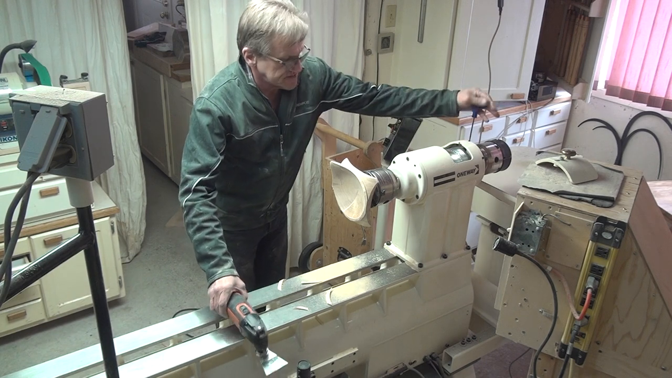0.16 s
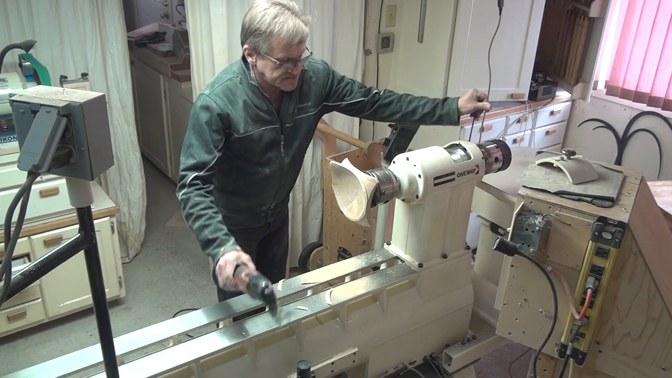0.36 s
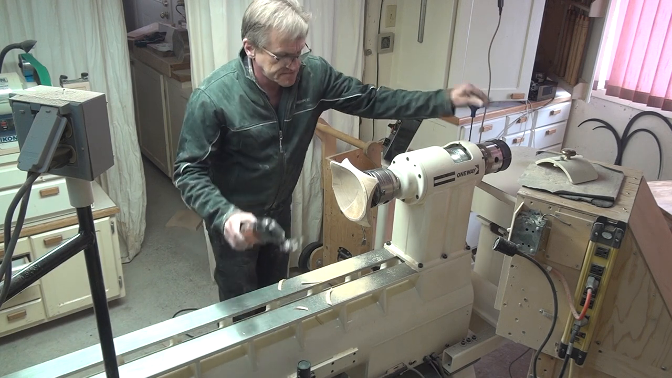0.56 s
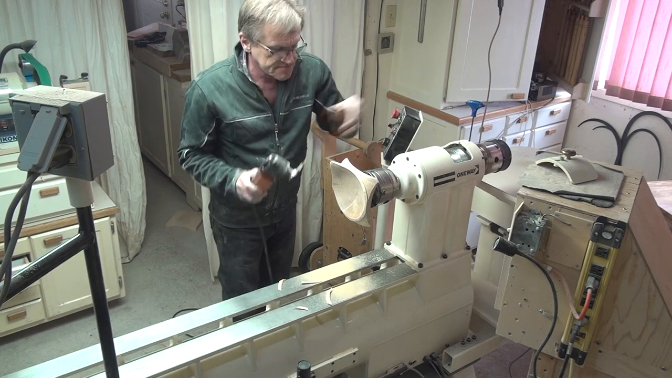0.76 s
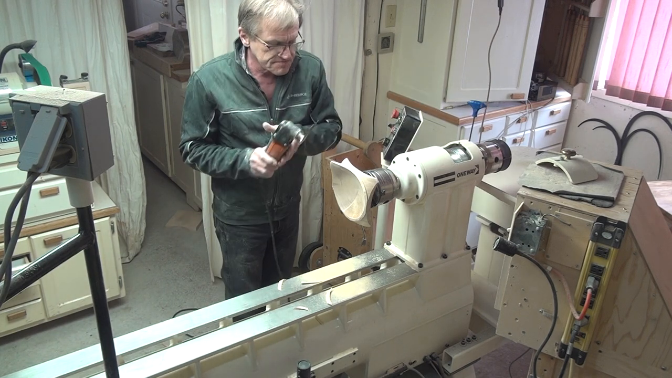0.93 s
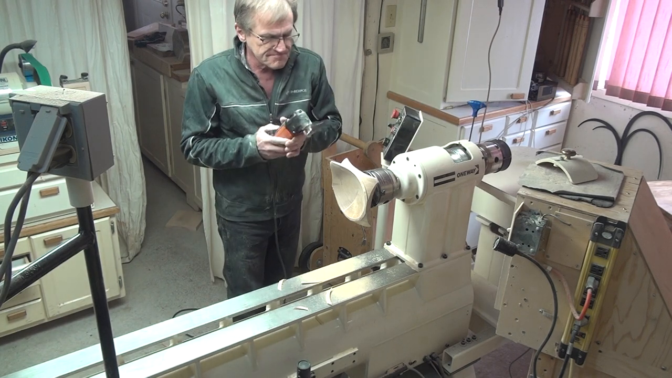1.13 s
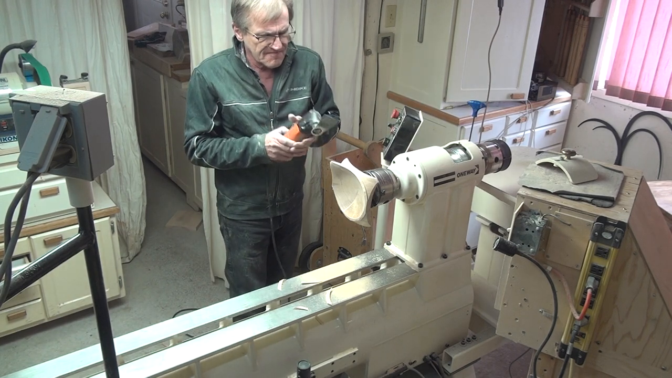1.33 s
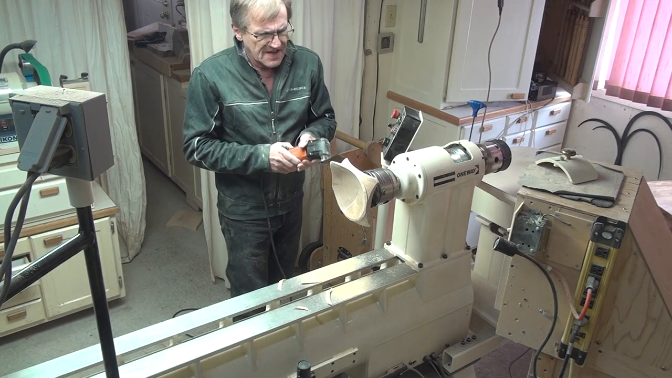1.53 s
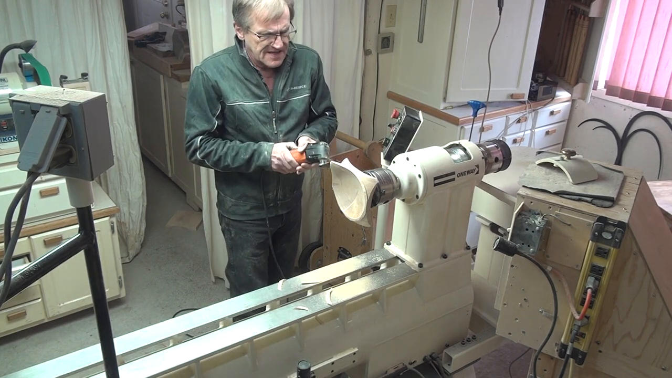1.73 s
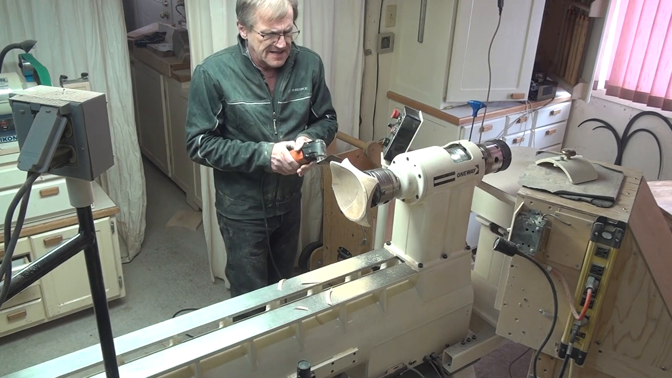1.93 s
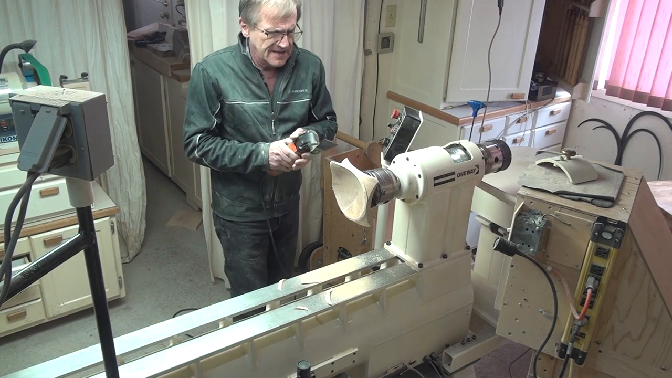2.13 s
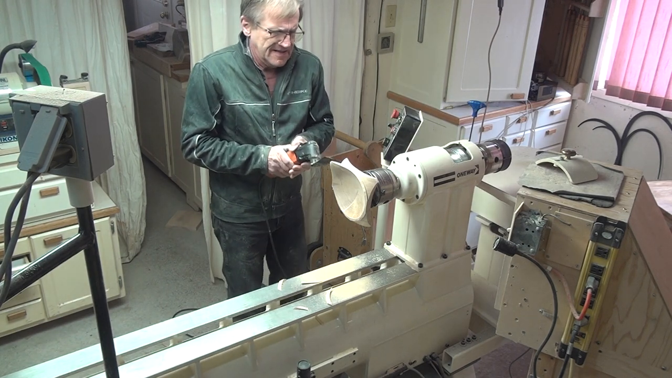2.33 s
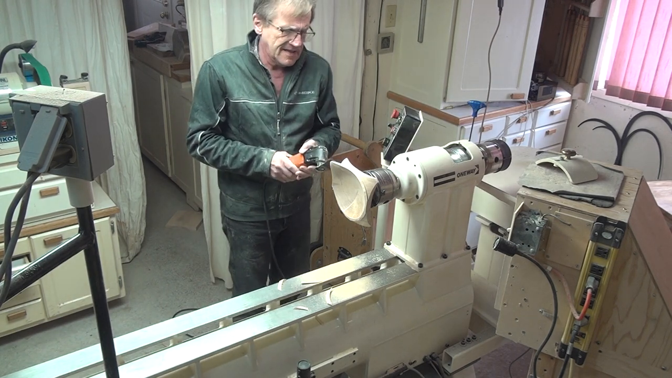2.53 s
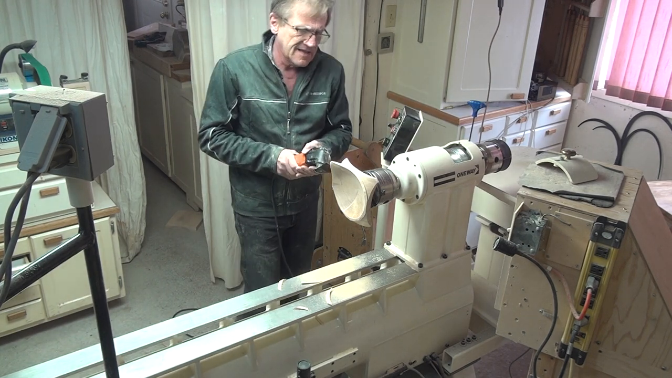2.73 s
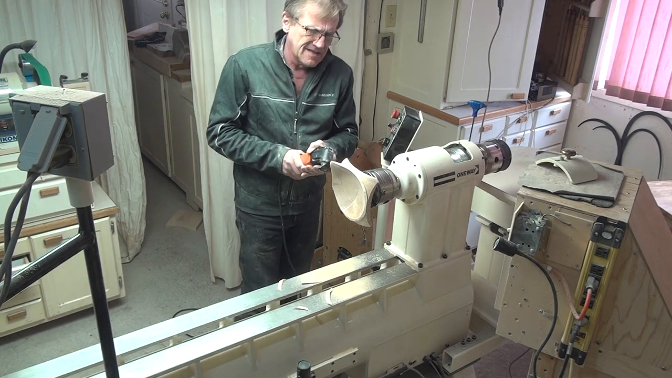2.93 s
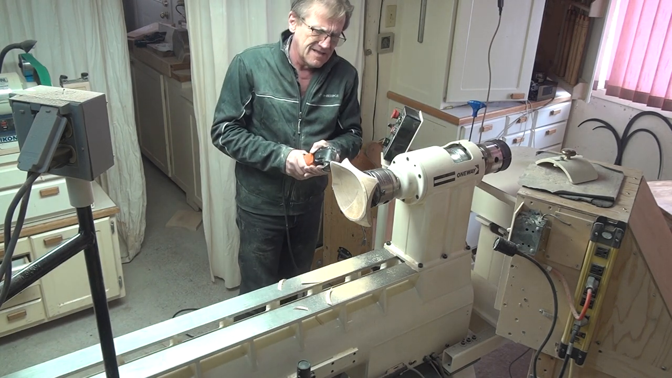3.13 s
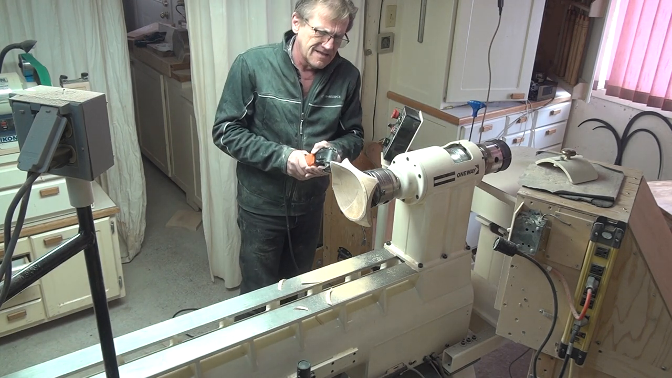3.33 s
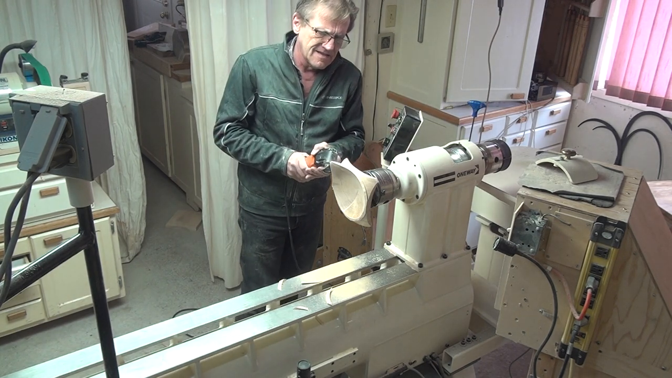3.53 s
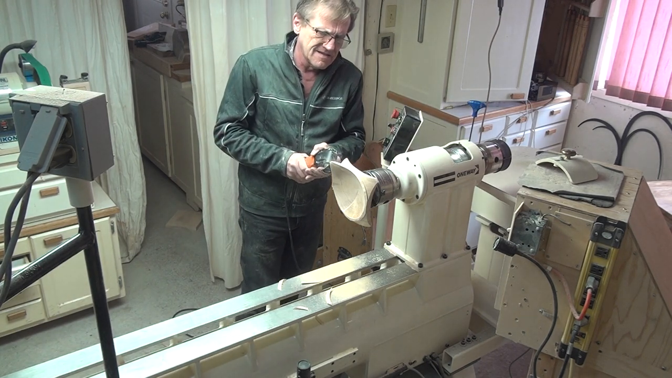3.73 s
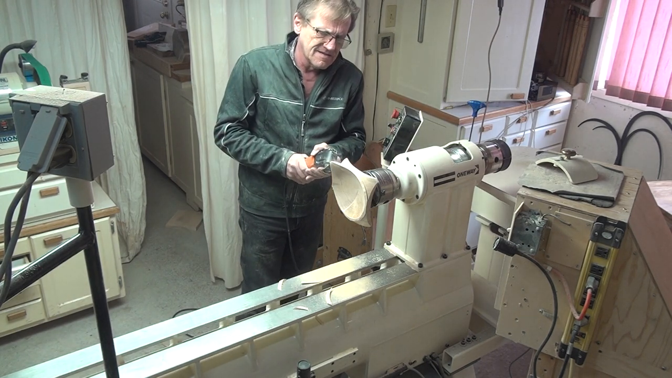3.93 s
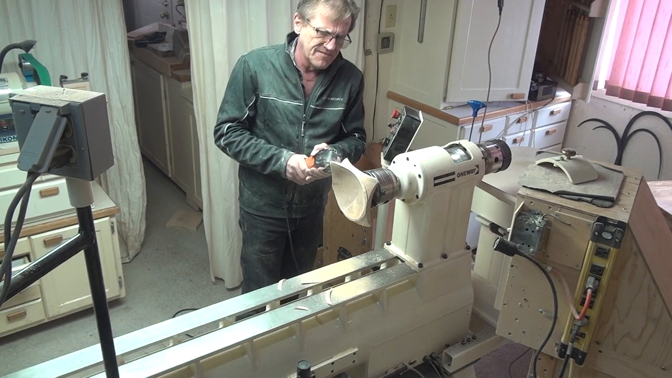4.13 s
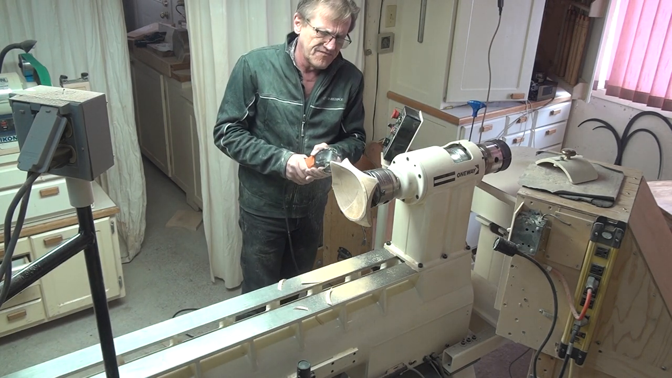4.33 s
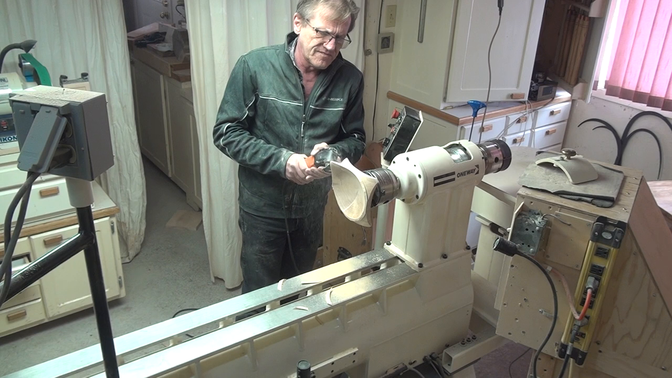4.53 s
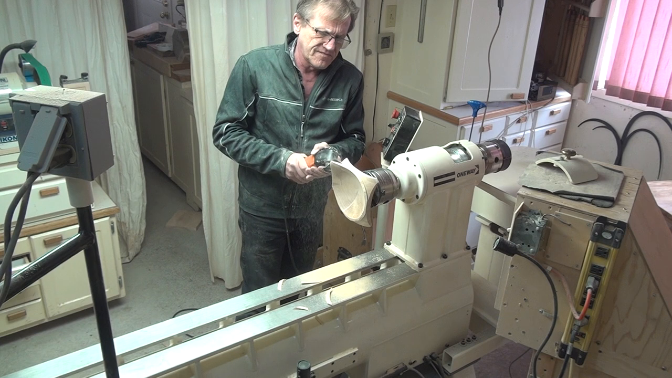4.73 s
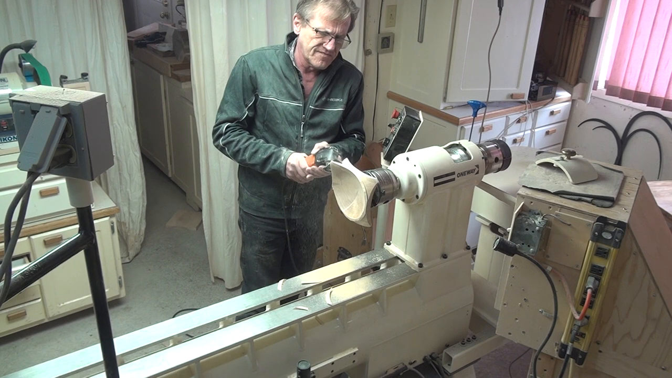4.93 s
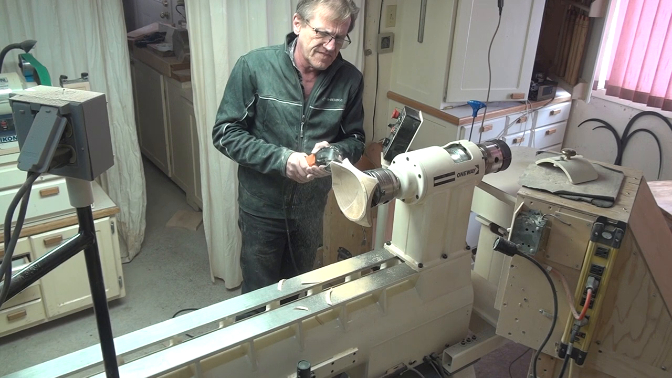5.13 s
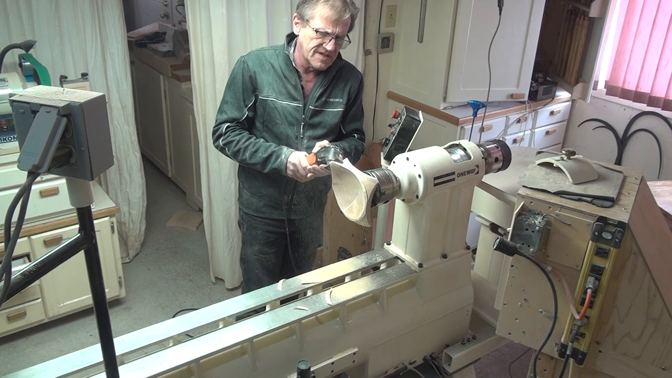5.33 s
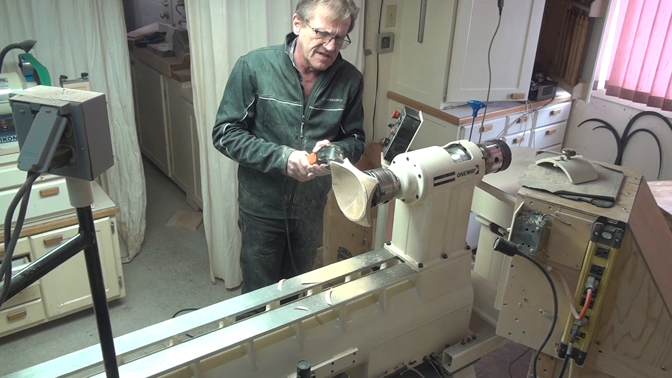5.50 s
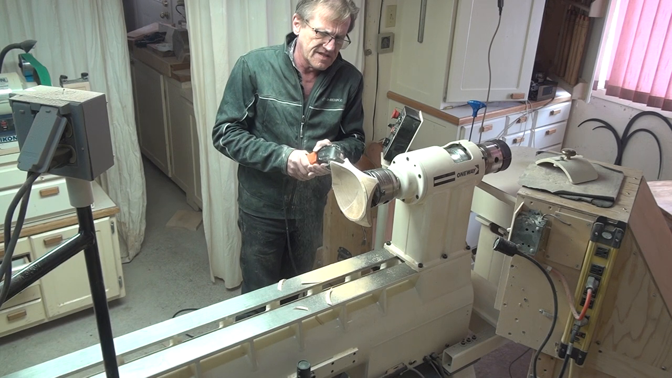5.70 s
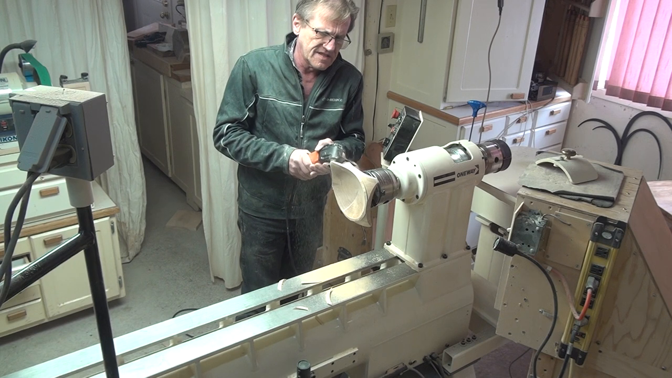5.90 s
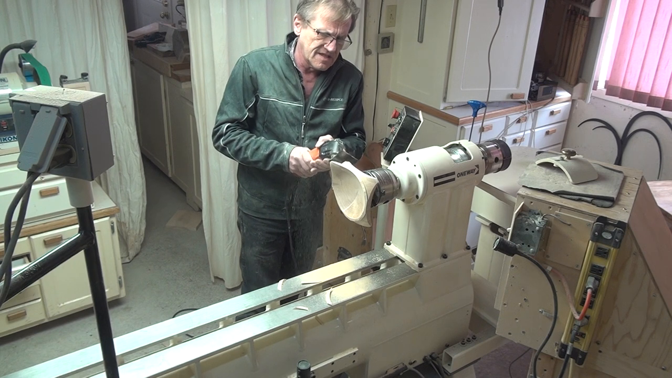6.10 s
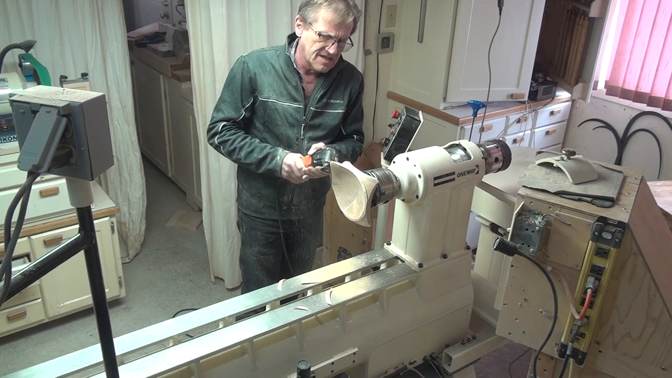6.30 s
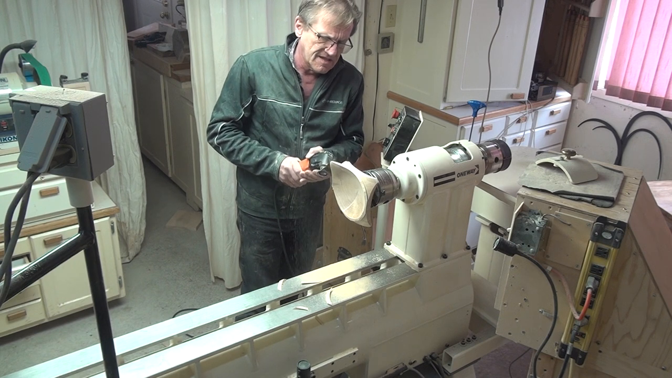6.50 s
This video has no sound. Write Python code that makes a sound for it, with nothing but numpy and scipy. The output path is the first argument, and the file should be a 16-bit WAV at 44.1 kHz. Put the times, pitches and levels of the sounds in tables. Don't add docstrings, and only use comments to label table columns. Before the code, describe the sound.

Light knocks and plastic clicks in a small workshop, then a handheld oscillating saw whirs up and buzzes harshly, sagging as it bites thin wood

```python
import sys
import numpy as np
from scipy import signal
from scipy.fft import rfft, irfft
from scipy.io import wavfile

SR = 44100
rng = np.random.default_rng(int(sys.argv[2]) if len(sys.argv) > 2 else 0)


def amplitude_ratio(level_db):
    exponent = np.asarray(level_db, float) / 20
    return 10 ** exponent


def waveform_to_disk(signal):
    frames = np.transpose(np.atleast_2d(signal))
    scaled = np.clip(frames, -1, 1) * 32767
    samples = np.round(scaled).astype(np.int16)
    wavfile.write(sys.argv[1], SR, samples)


N = 289296
TIME = np.arange(N) / SR


def in_time(rows):
    return np.interp(TIME, *np.transpose(rows))


def at_hz(points, hz):
    table = np.array(points)
    return np.interp(np.log(hz), np.log(table[:, 0]), table[:, 1])


def fade_in(start_s, length_s):
    return np.clip((TIME - start_s) / length_s, 0, 1)


def bump(s, half_s):
    return np.exp(-((TIME - s) / half_s) ** 2)


def shifts(rows):
    return sum(db * bump(s, half_s) for s, half_s, db in rows)


def drift(rate_hz):
    knots = rng.standard_normal(int(N / SR * 60) + 60)
    r = np.exp(-2 * np.pi * rate_hz / 60)
    slow = signal.lfilter([1], [1, -r], knots)[58:]
    return np.interp(TIME * 60, np.arange(len(slow)), slow / slow.std())


# (frequency [Hz], side minus mid [dB])
STEREO_SPREAD = [(60, -18), (200, -28), (380, -22), (700, -24), (1290, -13.5), (2380, -17), (4400, -14.5),
                 (9500, -9.5), (10900, -30)]


def noise(colour, edges, wider_db=0., modes=None):
    hz = np.maximum(np.fft.rfftfreq(N, 1 / SR), 1)
    if modes is None:
        gain = amplitude_ratio(at_hz(colour, hz))
    else:
        gain = sum(amplitude_ratio(db) / (1 + (2 * (hz - f) / width) ** 2) for f, width, db in modes)
    mid, side = rfft(rng.standard_normal((2, N))) * gain
    side = side * amplitude_ratio(at_hz(STEREO_SPREAD, hz) + wider_db)
    pair = np.array([mid + side, mid - side])
    bands = []
    for low, high in zip(edges, edges[1:]):
        band = irfft(pair / (1 + (low / hz) ** 8) / (1 + (hz / high) ** 8), N)
        bands.append(band / band.std())
    return bands


# (time [s], half length [s], level [dB], brightness [dB])
MOVES = [(.05, 0.14, -53.5, -8), (0.81, 0.12, -45.5, -4), (0.96, 0.044, -42.5, 1), (1.088, 0.071, -39, 1.5),
         (1.233, 0.069, -44.5, 0.5), (1.385, 0.081, -41, 2.5), (1.538, 0.07, -42.5, -0.5),
         (1.674, 0.041, -47.5, -7), (1.766, 0.04, -45.5, 0), (2.006, 0.028, -38.5, 5.5),
         (2.077, 0.025, -33.5, -6.5), (2.122, 0.028, -40.5, -5), (2.302, 0.22, -46, -5.5)]
STILL_AIR_DB = (-53.5, -52.5, -55.5)
# (frequency [Hz], density [dB per Hz])
RUSTLE_COLOUR = [(150, -49), (250, -15), (476, -2), (510, -11.5), (662, -1), (1140, -3.5), (3060, -0.5),
                 (5930, -6.5), (9830, -5.5), (16000, -11)]


def rustle():
    bands = noise(RUSTLE_COLOUR, [250, 1800, 6000, 17000], wider_db=3.0)
    tilts = [(-6, -0.58), (0, 0), (-5, 1)]   # (band level [dB], share of the brightness)
    out = 0
    for band, still_db, (lift_db, lean) in zip(bands, STILL_AIR_DB, tilts):
        power = amplitude_ratio(2 * still_db)
        for s, half_s, db, bright_db in MOVES:
            power = power + amplitude_ratio(2 * (db + lift_db + lean * bright_db)) * bump(s, half_s)
        out = out + np.sqrt(power) * amplitude_ratio(1.7 * drift(43)) * band
    return out * (TIME < 2.6)


# (frequency [Hz], level [dB rms])
HUM = [(119.8, -78), (179.7, -56), (240, -71)]


def hum():
    out = 0
    for hz, db in HUM:
        out = out + np.sqrt(2) * amplitude_ratio(db + 1.1 * drift(3.8)) * np.sin(2 * np.pi * hz * TIME)
    return out


# (time [s], level [dB])
BENCH_SHAKE = [
    (0, -74),
    (2.8, -60.5),
    (3.0, -50),
    (3.7, -37),
    (5.8, -42.5),
    (6.0, -58),
]
# (frequency [Hz], density [dB per Hz])
RUMBLE_COLOUR = [(20, -7), (90, -5), (130, -2), (200, -4), (400, 1)]


def rumble():
    level_db = in_time(BENCH_SHAKE) + 1.9 * drift(4.5)
    return amplitude_ratio(level_db) * noise(RUMBLE_COLOUR, [15, 450], wider_db=5.0)[0]


# (time [s], level [dB])
GAIN = [
    (0, 0.5),
    (2.197, -0.5),
    (2.204, -11.5),
    (2.3, -9.5),
    (2.75, -11),
    (2.95, -27.5),
    (6.56, -29.5),
]


def background():
    return (rustle() + hum() + rumble()) * amplitude_ratio(in_time(GAIN))


# (time [s], peak level [dB], low edge [Hz], high edge [Hz], decay t60 [s])
KNOCKS = [(0.801, -33, 606, 1100, 0.17), (0.91, -31, 250, 1270, 0.061), (.926, -37.5, 330, 630, 0.089),
          (1.065, -28.5, 250, 1360, 0.087), (1.072, -27, 1970, 3100, 0.056), (1.09, -35, 392, 900, 0.11),
          (1.286, -18, 1100, 1650, 0.029), (1.285, -16, 2200, 3200, 0.033), (1.286, -25.5, 3700, 4400, .03),
          (1.301, -29, 1100, 1500, .04), (1.45, -29.5, 1700, 3000, .04), (1.585, -19.5, 1680, 6530, 0.014),
          (1.667, -32.5, 870, 1320, 0.039), (1.989, -17.5, 1300, 2460, 0.064),
          (1.9892, -16.5, 2400, 4870, 0.077), (2.045, -33, 348, 910, 0.12), (2.0822, -13, 1900, 4930, 0.02),
          (2.09, -27.5, 346, 1300, 0.24), (2.2212, -23, 600, 4000, .04), (2.2276, -8.5, 1880, 5840, 0.026),
          (2.2314, -15, 2010, 3950, 0.017), (2.235, -24, 2020, 3580, 0.18),
          (2.227, -11.5, 4640, 12400, 0.075), (2.23, -28.5, 490, 1270, 0.096),
          (2.247, -17.5, 2000, 8800, 0.13), (2.448, -37, 895, 3000, .04), (2.499, -24.5, 1200, 5000, 0.026),
          (3.225, -24, 633, 1300, 0.16), (6.47, -26, 6000, 11000, .04)]


def knocks():
    out, t = np.zeros(N + SR), np.arange(SR // 4) / SR
    for s, db, low, high, t60 in KNOCKS:
        band = signal.butter(3, [low, high], "band", fs=SR, output="sos")
        decay = amplitude_ratio(-60 * t / t60) + 1.5 * amplitude_ratio(-60 * t / .012)
        push = rng.standard_normal(len(t)) * decay
        push[0] = 3.0
        crack = signal.sosfilt(band, push)
        out[round(s * SR):][:len(t)] += amplitude_ratio(db) * crack / abs(crack).max()
    return out[:N]


# (time [s], pitch [Hz], peak level [dB], decay t60 [s])
RINGS = [(.911, 404, -37, .09), (.927, 420, -36, .09), (.93, 651, -40, .06), (1.067, 651, -33, 0.055),
         (1.069, 402, -38, .1), (1.069, 2422, -35, .04), (1.99, 2116, -27, .05), (2.051, 480, -30, .04),
         (2.07, 520, -35, .04), (2.087, 400, -30.5, 0.046), (2.096, 760, -34, .04), (2.115, 600, -34, .05),
         (2.136, 700, -34, .04)]


def rings():
    out, t = np.zeros(N + SR), np.arange(SR // 4) / SR
    for s, hz, db, t60 in RINGS:
        ring = amplitude_ratio(db - 60 * t / t60) * np.sin(2 * np.pi * hz * t)
        out[round(s * SR):][:len(t)] += ring * np.minimum(t * 1000, 1)
    return out[:N]


def workshop(x, wet_db):
    room_t60_s = 0.22
    t = np.arange(SR // 2) / SR
    decay = amplitude_ratio(-60 * t / room_t60_s) * np.clip(t / 0.0085, 0, 1)
    mid, side = rng.standard_normal((2, len(t))) * decay
    tails = signal.lfilter([.6], [1, -.4], [mid + .25 * side, mid - .25 * side])
    tails = tails / np.linalg.norm(mid)
    return x + amplitude_ratio(wet_db) * signal.fftconvolve(x[None], tails, axes=1)[:, :N]


def spin():
    half_speed_s, spin_up_s = 2.777, .107
    return 1 / (1 + np.exp((half_speed_s - TIME) / spin_up_s))


# (time [s], speed lost [strokes per s])
SAG = [(3.2, -.9), (3.4, 4.8), (3.5, 9.3), (3.6, 13.4), (3.8, 20.5), (4.0, 21.7), (4.8, 29.5), (5.0, 29.9),
       (5.2, 29.5), (5.4, 27.7), (5.6, 26.8), (5.8, 23.7), (5.94, 20.7), (6.0, 11.9), (6.06, 7.3),
       (6.2, 3.9), (6.5, .3), (6.56, 0)]


def strokes():
    free_per_s = 281.5
    speed = free_per_s * spin() - in_time(SAG) * (TIME > 3.1)
    return np.cumsum(speed * (1 + 0.00055 * drift(14))) / SR


def level(free_db, cut_db, rows):
    full_load_sag = 28.9
    load = np.clip(in_time(SAG) / full_load_sag, 0, 1)
    return free_db + (cut_db - free_db) * load + shifts(rows)


# (time [s], level [dB])
RATTLE = [(2.33, -58), (2.43, -49), (2.5, -35), (2.62, -33), (2.72, -24.5), (2.8, -21.5), (2.88, -19),
          (2.97, -23), (3.28, -26.5), (3.42, -28), (4.0, -33), (5.22, -33.5), (5.4, -28), (5.6, -33.5),
          (5.93, -25), (5.95, -28.5), (6.2, -30), (6.56, -27)]
# (frequency [Hz], density [dB per Hz])
GRIT_COLOUR = [(120, -44), (300, -29.5), (520, -23), (650, -9), (850, -13), (1400, -6.5), (2200, -6.5),
               (3100, -3.5), (3700, -5), (4800, -8.5), (6500, -13.5), (12000, -16), (13500, -25),
               (15800, -25)]
# (frequency [Hz], width [Hz], level [dB])
HOUSING = [(482, 8.7, 2), (837, 12, 0), (1100, 45, -2), (1564, 41, -1.5), (2120, 92, -3), (3000, 55, -1),
           (4120, 48, -0.5), (10900, 90, -21), (11450, 70, -24), (12000, 83, -18)]
# (time [s], level [dB])
RINGING = [
    (2.33, -59),
    (2.44, -52),
    (2.5, -39),
    (2.7, -33),
    (2.86, -35.5),
    (2.96, -31.5),
    (3.15, -56),
]


def grit(turns):
    rattle_db, slow = in_time(RATTLE), 1 - spin()
    levels = (rattle_db - 12 + 6 * slow,
              rattle_db - 3.5,
              0.74 * (rattle_db + 30) - 37 - 7 * slow)
    bands = noise(GRIT_COLOUR, [90, 1800, 4300, 17000])
    rough = sum(amplitude_ratio(db + drift(18)) * band for db, band in zip(levels, bands))
    throb = 1 + 0.13 * np.cos(2 * np.pi * turns) + 0.055 * np.cos(4 * np.pi * turns)
    ringing = amplitude_ratio(in_time(RINGING) + 0.56 * drift(15)) * noise(None, [100, 17000], modes=HOUSING)[0]
    return (rough * throb + ringing * (TIME < 3.2)) * fade_in(2.28, 0.049)


def overtone(k, db, turns, wobble):
    phase = 2 * np.pi * (k * turns + rng.random() + wobble * drift(25))
    side = amplitude_ratio(at_hz(STEREO_SPREAD, 260 * k)) * np.cos(phase + rng.uniform(-.4, .4))
    side = side * rng.choice([-1, 1])
    return np.sqrt(2) * amplitude_ratio(db) * (np.sin(phase) + side * np.array([[1], [-1]]))


SINGERS = (5, 9, 11, 13, 1, 3, 20, 40, 4, 7)
# (running free [dB], in the cut [dB])
SINGER_DB = [(-36, -26.5), (-34.5, -26), (-40, -30), (-48.5, -28.5), (-55, -54.5), (-41.5, -36.5),
             (-34.5, -49), (-35, -49.5), (-38.5, -34.5), (-36, -35.5)]
# (time [s], half length [s], level [dB])
BOWL_SHIFTS = [
    [(3.87, 0.29, 8.5), (4.25, 0.078, -12), (5.45, 0.1, -6), (5.92, 0.38, -3.5), (6.3, 0.1, 6.5),
     (3.32, 0.092, 3), (5.98, .045, -5)],
    [(3.08, 0.044, 7), (3.13, .03, -2), (3.51, .012, -12), (3.655, 0.011, -8), (5.82, 0.0073, -12),
     (5.92, .012, -6), (6.55, .06, -3), (3.42, 0.039, 6.5), (3.59, 0.067, 7), (3.8, 0.03, -14),
     (5.03, 0.39, 6), (5.3, 0.065, -5), (5.47, 0.039, 2.5), (5.94, 0.056, -9), (6.27, 0.1, 2.5),
     (3.2, 0.054, -12), (6.47, 0.088, -5), (6.13, .08, -8), (5.2, .04, 2.5), (5.86, .03, 4)],
    [(5.68, 0.052, 3), (4.42, 0.084, 6.5), (5.3, 0.12, -16), (5.08, 0.13, -9), (5.3, 0.079, -5),
     (6.29, 0.15, 5), (6.5, .08, -7), (5.45, 0.091, -4), (3.6, .03, -5), (4.29, 0.055, -12)],
    [(3.3, 0.055, 9), (2.88, .08, 6), (3.65, .09, -4.5), (3.85, 0.22, 9), (4.25, 0.13, 7),
     (5.1, 0.092, -13), (5.6, .06, 6.5), (4.59, 0.026, -12), (6.33, .08, 13), (5.2, .04, -7),
     (3.6, .015, -9)],
]
# (time [s], half length [s], level [dB])
TOOL_SHIFTS = [
    [(4.97, 0.36, -20), (5.53, 0.18, -6), (3.8, 0.06, -2), (3.45, .05, -11), (6.08, 0.034, -7)],
    [(4.94, 0.38, -12.5), (2.95, 0.13, 9.5), (3.27, 0.12, -2), (5.87, 0.05, 2), (5.42, 0.091, 3.5),
     (6.0, 0.043, -5.5)],
    [(5.8, .07, 8), (3.26, 0.21, 3.5), (5.4, 0.14, -12), (4.56, 0.045, 10), (2.95, 0.056, -16),
     (2.89, 0.025, 11), (2.76, .03, 6)],
    [(2.92, 0.063, 6), (3.14, 0.39, -2.5), (6.12, 0.09, -7.5), (5.97, .04, 5), (5.4, 0.11, 9),
     (4.4, 0.054, 5.5), (3.3, .03, -14), (3.7, .04, -4), (4.7, .05, -6)],
    [(3.706, 0.11, -17.5), (3.43, 0.059, -12), (4.774, 0.18, -11), (2.94, 0.06, 6), (5.68, 0.092, -9),
     (5.98, 0.16, -9.5), (6.35, 0.16, 5)],
    [(5.43, 0.07, 5.5), (3.8, .06, -15), (4.12, 0.12, -15), (4.4, .1, 2), (5.93, 0.06, -16), (6.9, .15, -5),
     (6.45, 0.055, -6), (2.85, .05, 4.5), (3.12, 0.073, -7)],
    [(6.0, 0.11, -6.5), (6.3, 0.42, -2.5)],
]
# (time [s], rise [s])
WHINE_WAKES = (2.783, .1)
# (time [s], half length [s], level [dB])
SWEEP_FLARE = [
    (2.87, .09, 4.5),
]
# (time [s], half length [s], extra flutter [dB])
STUTTERS = [
    (3.297, 0.45, 2.5),
    (5.844, 0.18, 2.5),
]


def singers(turns, ragged):
    levels = {}
    for k, db, rows in zip(SINGERS, SINGER_DB, list(BOWL_SHIFTS) + list(TOOL_SHIFTS)):
        levels[k] = level(*db, rows)
        if k <= 5:
            levels[k] = levels[k] - 32 * (1 - spin())
    levels[40] = levels[40] - 19.0 * (1 - fade_in(*WHINE_WAKES))
    for k in (5, 7, 9, 11):
        levels[k] = levels[k] + shifts(SWEEP_FLARE)
    levels[2] = levels[3] - 16.5
    out = 0
    for k, db in levels.items():
        if k < 20:
            flutter_db = (1.2 + shifts(STUTTERS)) * drift(11)
        else:
            flutter_db = 3.5 * drift(20)
        out = out + overtone(k, db + flutter_db, turns, ragged)
    return out


# (running free [dB], in the cut [dB])
EVEN_DB = (-30, -32)
# (time [s], half length [s], level [dB])
BLADE_SHIFTS = [
    [(2.95, .1, -8), (3.35, 0.33, -7), (3.45, .05, 6), (3.07, .03, 8), (4.2, 0.056, -3), (4.7, .05, 5),
     (5.12, .1, -6), (5.45, 0.087, 7), (5.85, 0.096, 4), (6.0, .05, -6), (6.35, .3, 4)],
    [(3.1, 0.054, 4.5), (3.47, .09, 6.5), (3.82, 0.22, 3.5), (4.1, 0.074, -6), (4.7, 0.49, -9),
     (5.18, 0.078, -14), (5.45, .09, 9), (5.87, .06, -6), (6.3, .05, -10), (6.15, 0.055, -4),
     (3.06, .04, -4), (6.5, .1, -3), (3.6, .02, -4)],
    [(3.05, .12, -8), (3.5, 0.054, 6), (3.7, .06, 3), (4.15, 0.073, -10), (4.45, 0.14, 6.5), (5.1, .05, 7),
     (5.2, .05, -4), (5.55, .08, -8), (5.9, 0.045, -6), (6.45, .1, -13), (6.1, .08, 4.5), (4.65, .05, 4),
     (5.63, .05, 4)],
    [(3.03, .12, -2), (3.3, .1, 5.5), (3.5, 0.055, 7.5), (3.73, 0.1, -6), (3.98, 0.094, -12),
     (4.47, 0.074, 3.5), (4.4, .06, 3), (5.04, .08, -6), (5.8, .05, 6.5), (6.0, .06, -9), (6.3, .2, -5.5),
     (6.1, 0.087, -7), (3.54, 0.019, -10), (3.42, .012, -11), (3.2, 0.087, -5)],
]


def blade(turns, ragged):
    out = 0
    for k, lift_db, rows in zip((6, 8, 10, 12), (-9.5, -5.0, -5.5, -2.0), BLADE_SHIFTS):
        db = level(*EVEN_DB, rows) + shifts(SWEEP_FLARE) + lift_db
        out = out + overtone(k, db + 2.1 * drift(10), turns, ragged)
    return out


HALVES = (8.5, 9.5, 10.5, 11.5, 12.5)
# (time [s], half length [s], level [dB])
HALF_SHIFTS = [
    [(4, 0.076, 10), (5.6, .12, 6), (6.5, .12, 6)],
    [(3.85, .15, -10), (4.8, .7, -3), (5.7, .1, -6), (6.15, .1, 3), (6.4, .15, 7)],
    [(3.9, .3, -6), (5.5, .15, -7), (6.2, .08, 2)],
    [(3.25, .13, 5), (3.75, .06, -5), (4.3, .15, -6), (6.1, 0.091, 11), (6.5, .1, 4)],
    [(3.8, .12, 7), (4.55, .35, 7), (5.55, .06, 4)],
]


def drive_play(turns, ragged):
    play_db = -45.5 + 0.51 * (in_time(RATTLE) + 32)
    out = 0
    for k, rows in zip(HALVES, HALF_SHIFTS):
        out = out + overtone(k, play_db + shifts(rows) + 1.8 * drift(6.2), turns, ragged + 0.13)
    return out


# (multiple of the stroke rate, level [dB])
UPPER_COLOUR = [(14, 7.5), (17, 1), (21, 2.5), (24, -6.5), (28, -3), (31, -5.5), (34, -14), (45, -19)]
# (running free [dB], in the cut [dB])
UPPER_DB = (-51, -48.5)
# (time [s], level [dB])
BLADE_TIP = [
    (3.1, -10),
    (3.3, 5.5),
    (4.4, 3.5),
    (4.7, -1),
    (5.9, -2.5),
]
TEETH = (14, 15, 16, 17, 19, 21, 23)
# (time [s], half length [s], level [dB])
TEETH_SHIFTS = [
    [(3.45, .2, -3), (4.17, .15, 4), (4.8, .15, -6), (5.2, .05, 7), (6.0, .04, -7), (6.2, .15, 5),
     (4.45, .06, 5), (2.88, .08, 4)],
    [(5.42, 0.038, 7), (4.87, 0.11, -12), (5.2, .05, -9), (5.9, .04, 7)],
    [(3.8, .08, -8), (5.8, 0.16, 9)],
    [(5.28, 0.22, 9), (4.6, .12, 5), (2.8, .098, -19), (3.1, .15, -5), (3.73, .08, -9), (4.6, 0.088, 5.5)],
    [(3.38, 0.082, 7), (5.17, 0.21, 6.5), (5.75, 0.15, 11.5), (3.8, 0.27, -5), (4.9, 0.067, -9)],
    [(4.6, 0.04, 9.5), (3.45, .05, 9), (3.64, 0.023, 11.5), (3.15, .15, -10), (4.49, .1, -5),
     (6.0, .07, -10)],
    [(4.5, 0.13, 8.6), (5.38, 0.27, 8), (5.8, 0.13, 7)],
]
TIP = (18, 22, 24, 25, 26, 27, 28, 29, 30, 31, 32, 33, 34)
# (time [s], half length [s], level [dB])
TIP_SHIFTS = [
    [(3.45, .15, 3), (5.75, .18, 7)],
    [(3.63, .12, 12), (3.25, .1, -4)],
    [(5.1, .17, 8)],
    [(3.6, 0.085, 5.5), (5.4, .1, 3), (3.4, .15, -5)],
    [(3.5, .17, 5), (5.6, .1, 4)],
    [(3.45, .2, 7), (4.2, .09, -8), (5.2, .4, -4)],
    [(3.6, .15, 4), (5.4, .1, 8)],
    [(3.88, 0.25, 6), (4.4, .09, 6), (3.5, .15, -8), (4.62, .08, -6)],
    [(4.4, .1, 12), (5.1, .3, 7)],
    [(3.5, .15, 5), (4.75, .15, -5)],
    [(4.2, .15, 8), (3.25, .15, -6)],
    [(4.05, .17, 5), (4.85, .15, 5), (3.3, .15, -5)],
    [(3.4, .1, 7), (5.4, .1, 13), (4.2, .3, 4)],
]


def teeth_and_tip(turns, ragged):
    upper_db = level(*UPPER_DB, TOOL_SHIFTS[6])
    upper_db = upper_db + 0.88 * (in_time(RATTLE) + 32) * fade_in(2.67, 0.67)
    contact = {**dict(zip(TEETH, TEETH_SHIFTS)), **dict(zip(TIP, TIP_SHIFTS))}
    out = 0
    for k in range(14, 45):
        if k in (20, 40):
            continue
        odd_db = 2.5 if k % 2 else -2.5
        colour_db = np.interp(k, *np.transpose(UPPER_COLOUR)) + odd_db + in_time(BLADE_TIP) * (k > 23)
        flutter_db = 2.8 * drift(20) if k in contact else 4 * drift(3.5)
        db = upper_db + shifts(contact.get(k, [])) + colour_db + flutter_db
        out = out + overtone(k, db, turns, ragged + .06)
    return out


# (time [s], level [dB])
WHINE_60 = [
    (2.72, -60),
    (2.8, -47),
    (2.83, -41),
    (2.86, -50),
    (2.91, -40),
    (2.94, -48),
    (3.03, -52),
    (3.12, -62),
    (4.8, -65),
    (6.56, -70),
]


def whine(turns, ragged):
    return overtone(60, in_time(WHINE_60) + 5 * drift(25), turns, ragged + .1)


def buzz(turns):
    ragged = .03 + .05 * (1 - fade_in(2.84, .12))
    out = singers(turns, ragged) + blade(turns, ragged) + drive_play(turns, ragged)
    out = out + teeth_and_tip(turns, ragged) + whine(turns, ragged)
    return out * fade_in(2.69, 0.16)


def vents():
    narrow = [(hz, width_hz / 2, db) for hz, width_hz, db in HOUSING[-3:]]
    whistle = noise(None, [100, 17000], modes=narrow)[0]
    return amplitude_ratio(-50 + 3 * drift(20)) * bump(2.9, .17) * whistle


# (time [s], level [dB rms])
SLAP = [
    (3.05, -60),
    (3.17, -33),
    (3.3, -31),
    (3.45, -42),
    (5.9, -50),
    (5.99, -31),
    (6.05, -29),
    (6.17, -27),
    (6.28, -32),
    (6.56, -31),
]
# (frequency [Hz], width [Hz], level [dB])
SLAP_MODES = [(2450, 450, -3), (3100, 450, 0)]


def slaps(turns):
    alternate_db, scatter_db, jitter_s = 3.5, 1.6, .00004
    at = np.flatnonzero(np.diff(np.floor(turns)))
    size_db, late = rng.standard_normal((2, len(at)))
    swing = np.cos(np.pi * np.cumsum(rng.random(len(at)) > .06))
    clicks = np.full(N, 1e-18)
    places = np.clip(at + (late * jitter_s * SR).astype(int), 0, N - 1)
    clicks[places] = amplitude_ratio(alternate_db * swing + scatter_db * size_db)
    out = 0
    for i, (hz, width_hz, db) in enumerate(SLAP_MODES):
        r = np.exp(-np.pi * width_hz / SR)
        poles = [1, -2 * r * np.cos(2 * np.pi * hz / SR), r * r]
        mode = signal.lfilter([1, 0, -1], poles, clicks) * (1 - r * r)
        out = out + (-1) ** i * amplitude_ratio(db) * mode
    out = signal.sosfilt(signal.butter(2, [1500, 4200], "band", fs=SR, output="sos"), out)
    return workshop(amplitude_ratio(in_time(SLAP)) * out / out[N // 2:].std(), wet_db=-12)


def scene():
    turns = strokes()
    tool = (buzz(turns) + grit(turns)) * amplitude_ratio(np.array([[-.3], [.3]]))
    duck = np.where(TIME < 2.224, amplitude_ratio(in_time(GAIN)), 1)
    handling = workshop(knocks() + rings(), wet_db=-3.0) * duck
    return background() + handling + tool + vents() + slaps(turns)


def low_pass(x):
    return signal.sosfilt(signal.butter(12, 17010, fs=SR, output="sos"), x)


def record(dry):
    top_cut = signal.cheby2(20, 60, 16050, fs=SR, output="sos")
    mix = signal.sosfilt(top_cut, dry)
    return low_pass(mix)


dry = scene()
out = record(dry)
waveform_to_disk(out)
```